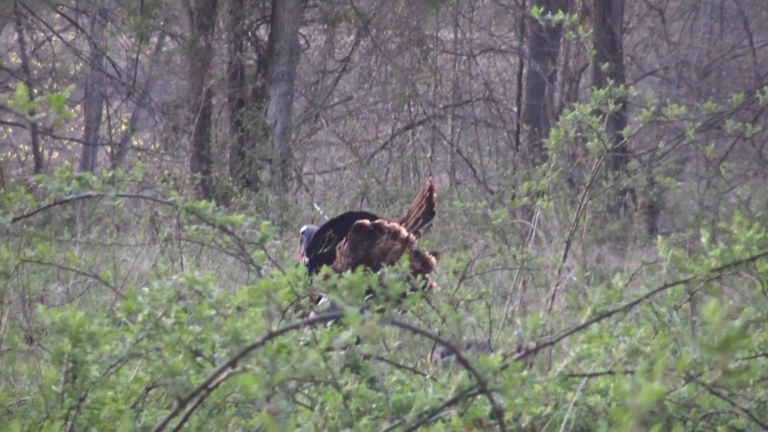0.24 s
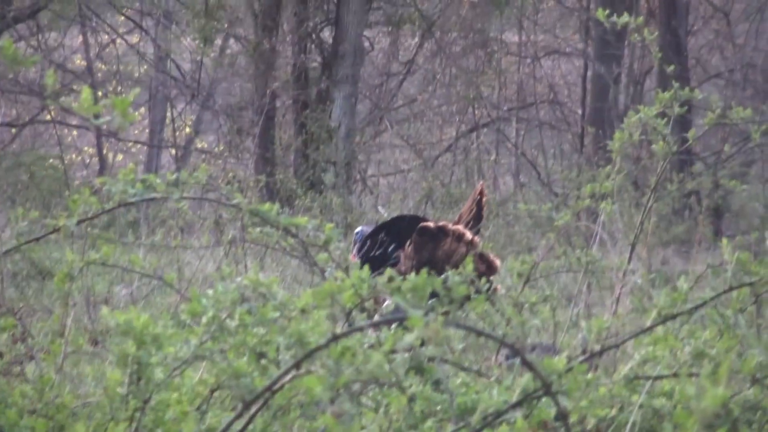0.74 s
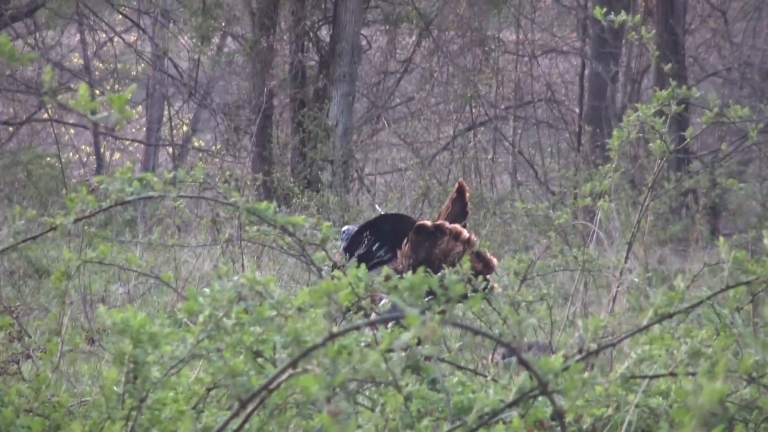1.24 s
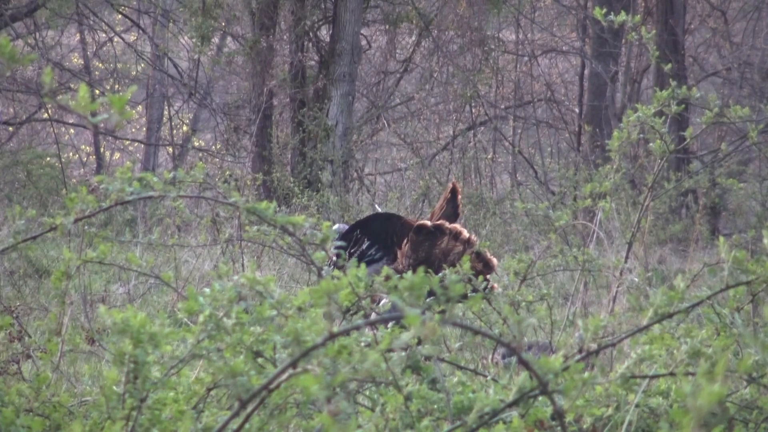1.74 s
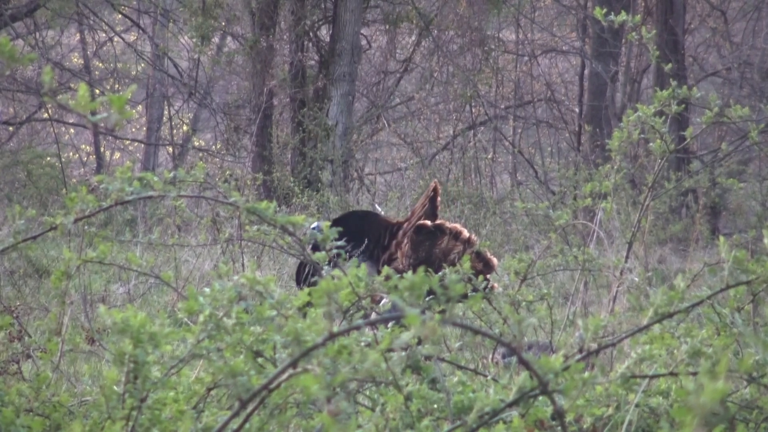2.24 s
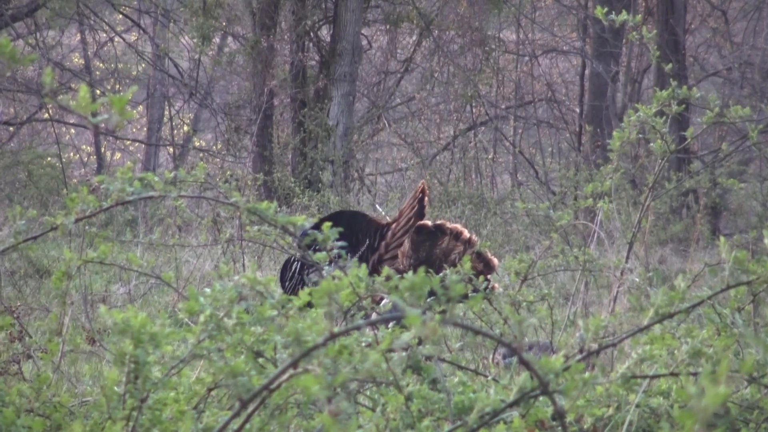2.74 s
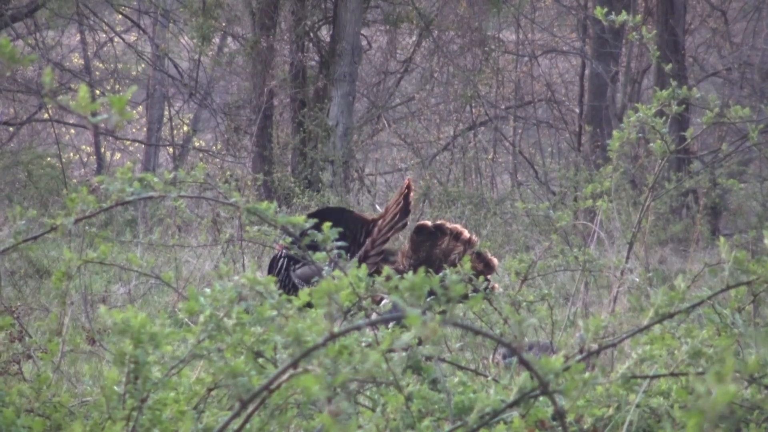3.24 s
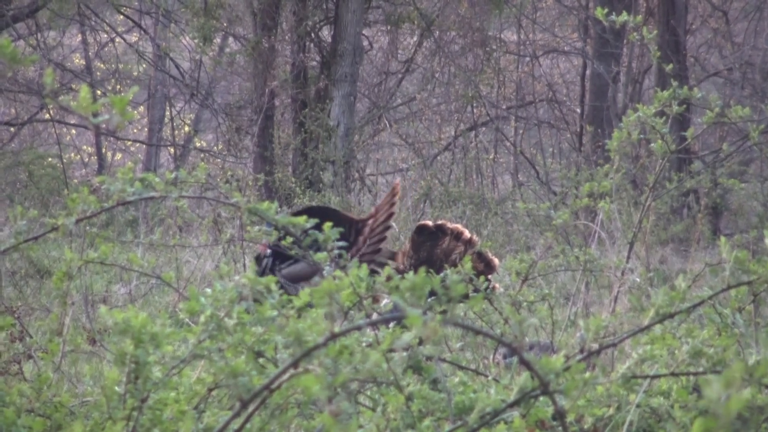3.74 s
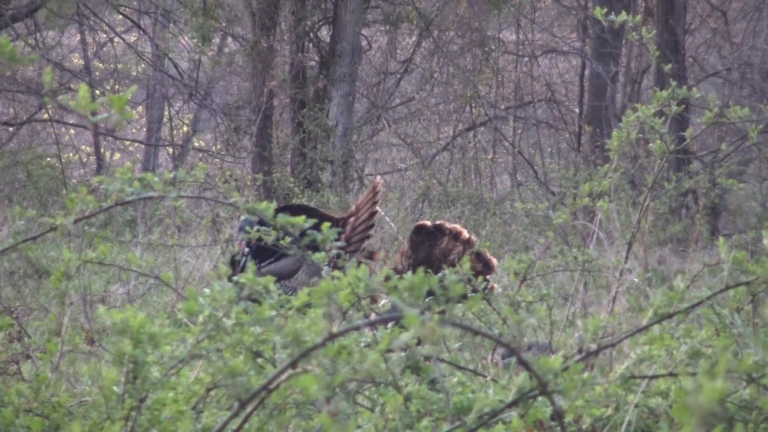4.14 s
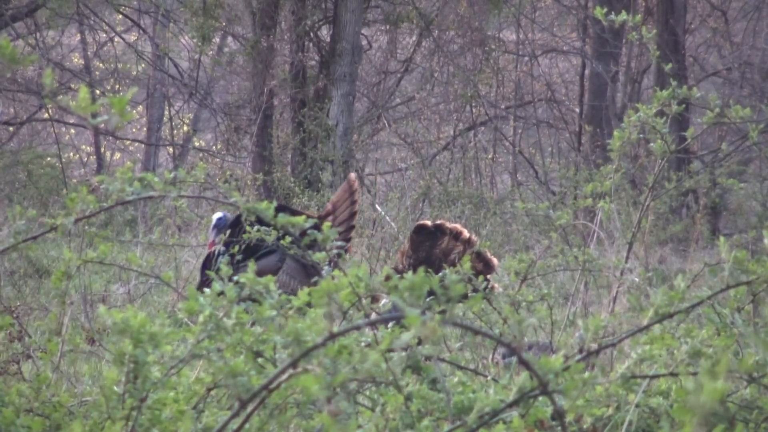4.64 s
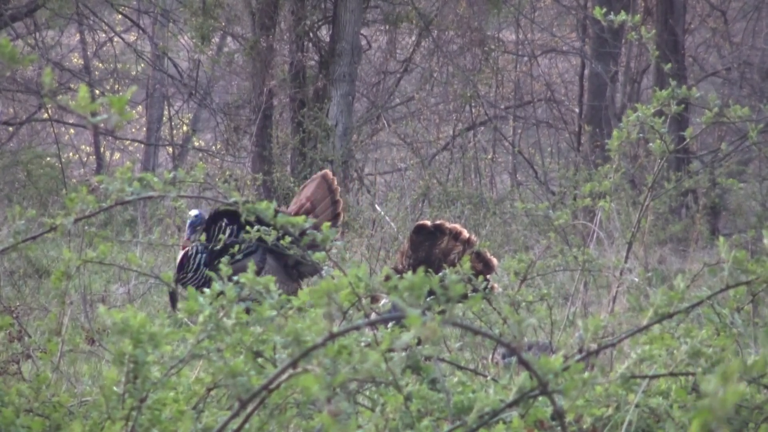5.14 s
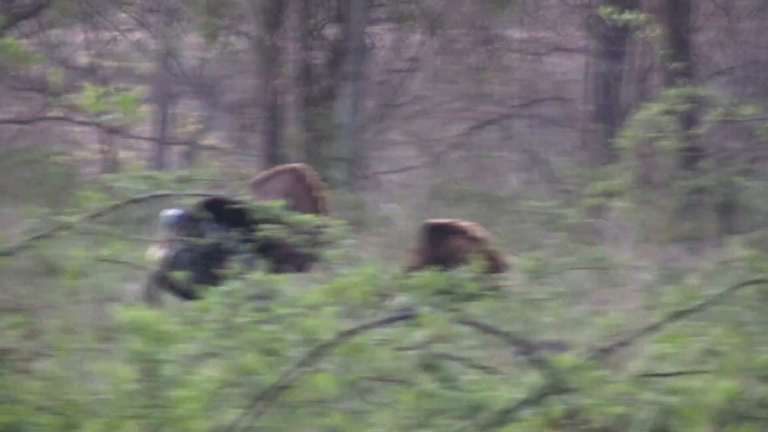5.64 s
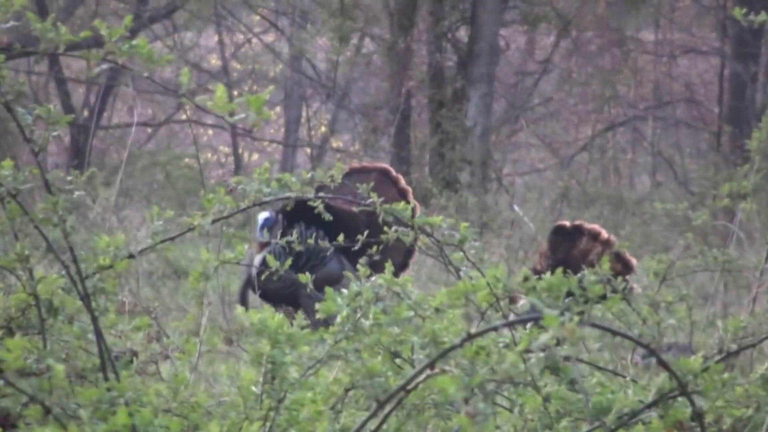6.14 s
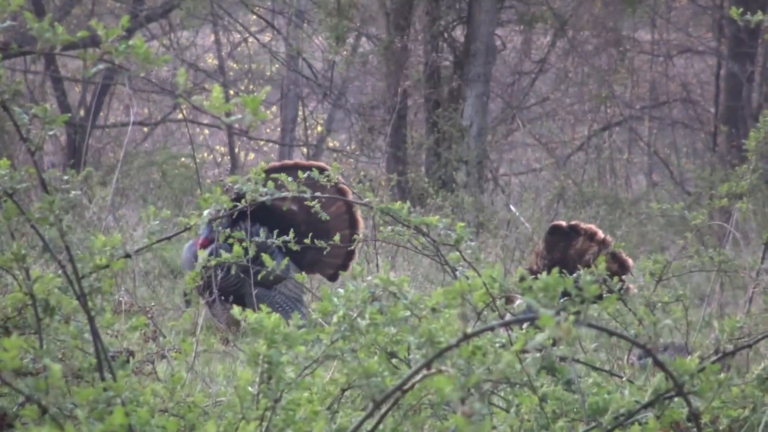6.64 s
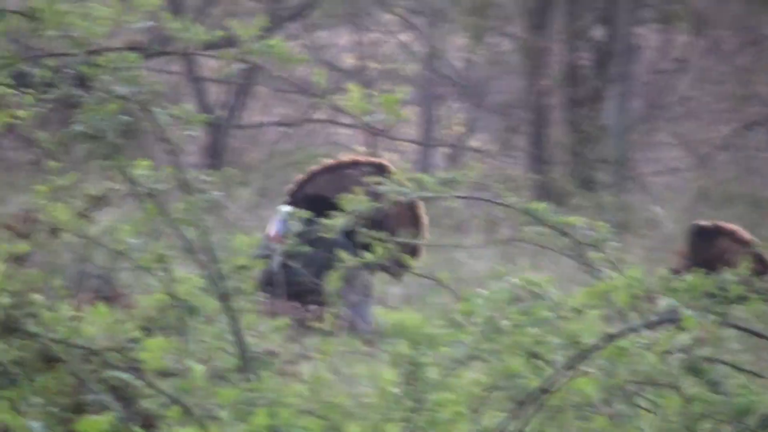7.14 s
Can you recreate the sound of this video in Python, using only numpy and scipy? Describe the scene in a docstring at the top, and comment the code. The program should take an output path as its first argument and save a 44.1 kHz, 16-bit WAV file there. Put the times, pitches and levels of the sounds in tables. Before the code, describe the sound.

Songbirds warble and whistle some way off in the woods, over soft leaf noise and a low drone. A wild turkey gives seven short, sharp, rasping clucks, close and loud, each echoing lightly among the trunks. A bird then sings a rising trill and more whistles, high and low in turn. Near the end a faint far whine passes, twigs tick, and the microphone takes several dull handling bumps.

```python
"""Seven sharp turkey-like clucks, close and loud: a rough, rasping tone through fixed resonances, with a
low fundamental and a bright scrape. Further off in the spring woods, songbirds whistle, slur, warble and
trill in frequency-modulated tones, and the trunks reverberate with every call. Beneath lie a low drone,
leaf noise, microphone hiss, a far whine, and the damped vibrations of twigs and a bumped camera.
The recorder's gain control turns bass and treble down after each cluck."""
import sys
import numpy as np
from scipy import signal
from scipy.fft import rfft, irfft, next_fast_len
from scipy.io import wavfile
from scipy.ndimage import uniform_filter1d, map_coordinates

SR = 44100
rng = np.random.default_rng(int(sys.argv[2]) if len(sys.argv) > 2 else 0)


def unload_wav(signal):
    """Save mono or channel-first audio to the path in sys.argv[1] as 16-bit WAV at rate SR, clipped to [-1, 1]."""
    wavfile.write(
        sys.argv[1],
        SR,
        np.round(np.clip(np.atleast_2d(signal).T, -1, 1) * 32767).astype(np.int16),
    )


N = 325891


def amp(db):
    """Amplitude ratio of a level in decibels."""
    return 10 ** (np.asarray(db) / 20)


def unit(x):
    """Normalisation to rms 1."""
    return x / np.sqrt(np.mean(x ** 2) + 1e-20)


def along(points, hz):
    """Interpolation of (Hz, value) points on a logarithmic frequency axis."""
    f, values = np.transpose(points)
    return np.interp(np.log(hz + 1), np.log(f + 1), values)


def span(start, length):
    """An event's samples, its age in seconds and the share of its length gone."""
    at = np.arange(round(start * SR), round((start + length) * SR))
    age = (at - at[0]) / SR
    return at, age, age / age[-1]


def contours(rows):
    """Linear interpolation in time: a table's samples, a soft-edged gate and its columns per sample."""
    times, *columns = np.transpose(rows)
    at = np.arange(round(times[0] * SR), min(round(times[-1] * SR), N))
    gate = np.clip(np.minimum(at - at[0], at[-1] - at) / 180, 0, 1)
    return at, gate, [np.interp(at / SR, times, column) for column in columns]


def edges(age, attack_s, release_s):
    """Amplitude envelope with quadratic attack and release."""
    return np.clip(np.minimum(age / attack_s, (age[-1] - age) / release_s), 0, 1) ** 2


def wobble(rate, size):
    """Random modulation: a smooth curve through `rate` random values a second."""
    knots = rng.standard_normal(int(size * rate / SR) + 4)
    return map_coordinates(knots, [np.arange(size) * rate / SR])


def phase_of(hz):
    """Phase in radians, the time integral of angular frequency."""
    return 2 * np.pi * np.cumsum(hz) / SR


def tone(hz):
    """A sinusoid of rms 1 that follows a frequency contour."""
    return np.sqrt(2) * np.sin(phase_of(hz))


def filtered(x, response):
    """Linear filtering: the spectrum is multiplied by a frequency response."""
    size = next_fast_len(N + SR // 2)
    return irfft(rfft(x, size) * response(np.fft.rfftfreq(size, 1 / SR)), size)[..., :N]


def coloured(spectrum):
    """Spectral shaping of white noise, scaled to rms 1."""
    return unit(filtered(rng.standard_normal(N), lambda hz: amp(along(spectrum, hz))))


# Three noise spectra. Each row: frequency in Hz, relative spectral density in dB.
DRONE_SPECTRUM = [(12, -52), (20, -13.5), (157, 1.5), (174, -0.5), (220, -8.5), (254, -6.5), (282, -15),
                  (333, -16), (450, -20.5), (580, -51), (990, -120)]
LEAF_SPECTRUM = [(180, -30.5), (300, -9.5), (484, -10), (1470, -16.5), (1660, -19.5), (3440, -25),
                 (6080, -31), (12000, -40), (15600, -73), (22000, -120)]
HISS_SPECTRUM = [(5880, -26), (10000, -13), (14900, 5), (15900, -14.5)]
# Background levels. Each row: time in seconds, leaf level in dB, drone level in dB.
WOODS_LEVELS = [(0, -48.5, -41), (0.401, -54, -45), (.72, -56, -54.5), (.9, -51.5, -41.5),
                (1.3, -48.5, -44.5), (2.1, -46, -41.5), (2.299, -48.5, -41.5), (2.799, -45, -38.5),
                (3.502, -48, -41.5), (4.199, -48.5, -43.5), (4.5, -48, -40), (5.05, -47, -38),
                (5.3, -45.5, -41.5), (5.62, -46.5, -43), (5.65, -53, -35), (5.9, -55.5, -48.5),
                (6.75, -54, -50.5), (7.39, -56, -45.5)]
# Microphone self-noise. Each row: time in seconds, level in dB.
HISS_LEVELS = [(0, -74), (.45, -84.5), (.75, -82.5), (.95, -74), (2.1, -71.5), (2.5, -65), (4.2, -65.5),
               (5.62, -68.5), (5.65, -83.5), (6.3, -79.5), (7.39, -82.5)]


def background():
    """Amplitude-modulated noise: a low drone, leaves and microphone hiss waver in level."""
    t = np.arange(N) / SR
    times, *levels = np.transpose(WOODS_LEVELS)
    leaves_db, drone_db = (np.interp(t, times, level) for level in levels)
    hiss_db = np.interp(t, *np.transpose(HISS_LEVELS))
    sway = wobble(11, N)
    drone = amp(drone_db + 1.4 * wobble(12, N)) * coloured(DRONE_SPECTRUM)
    leaves = amp(leaves_db + 1.1 * sway) * coloured(LEAF_SPECTRUM)
    hiss = amp(hiss_db + 1.2 * sway) * coloured(HISS_SPECTRUM)
    return drone + leaves + hiss


# A far tone that climbs and sinks. Each row: time in seconds, frequency in Hz, level in dB.
WHINE_CONTOUR = [(4.8, 1318, -82), (5.35, 1454, -46.5), (5.9, 1500, -57.5), (6.4, 1460, -62.5),
                 (6.9, 1380, -58)]


def far_whine():
    """Spectral broadening: random amplitude and phase blur a distant tone."""
    at, gate, (hz, db) = contours(WHINE_CONTOUR)
    blur = wobble(110, len(at)) + 1j * wobble(110, len(at))
    out = np.zeros(N)
    out[at] = gate * amp(db) * np.real(blur * np.exp(1j * phase_of(hz)))
    return out


def knocks(events, attack_s, waver, noise):
    """Damped oscillation: a wavering tone and a puff of noise share one exponential decay."""
    out, t = np.zeros(N + SR), np.arange(SR // 5) / SR
    for row, (start, db, hz, t60) in enumerate(events):
        ring = np.sin(phase_of(hz * np.exp(waver * wobble(hz / 2, len(t)))))
        puff = noise[row * len(t):][:len(t)]
        envelope = amp(db + 0.5 - 60 * t / t60) * (1 - np.exp(-t / attack_s)) ** 2
        out[round(start * SR):][:len(t)] += envelope * (ring + puff)
    return out[:N]


# Bumps. Each row: start in seconds, level in dB, frequency in Hz, 60 dB decay time in seconds.
CAMERA_BUMPS = [(0.394, -18.5, 132, 0.065), (5.6, -26.5, 119, 0.31), (5.659, -23, 47.6, 0.1),
                (5.734, -16.5, 160, 0.14), (6.022, -19.5, 137.2, 0.19), (6.741, -30, 129, 0.37),
                (6.793, -23.5, 318, 0.048), (6.814, -23.5, 51.3, 0.13), (6.861, -21, 60.7, 0.23),
                (6.883, -21, 170, 0.15), (7.016, -27, 283, 0.033), (7.116, -30.5, 273, 0.18),
                (7.348, -33.5, 334, 0.06)]
# Thud of the camera body. Each row: frequency in Hz, relative spectral density in dB.
THUD_SPECTRUM = [(15, -2), (40, 3.5), (150, 6.5), (400, -7.5), (700, -40), (1200, -120)]


def camera_bumps():
    """Impact excitation: the camera body answers each bump with a low, damped thud."""
    return knocks(CAMERA_BUMPS, attack_s=0.0016, waver=0.23, noise=amp(-6.5) * coloured(THUD_SPECTRUM))


# Ticks and rustles. Each row: start in seconds, level in dB, frequency in Hz, 60 dB decay time in seconds.
TWIG_TICKS = [(5.254, -26.5, 5350, .015), (5.499, -25, 5300, 0.012), (5.961, -19.5, 5820, 0.0086),
              (6.355, -39, 6084, 0.021), (7.04, -39, 4700, 0.11), (7.041, -44, 2230, 0.093)]
# Bright noise of twigs and clucks. Each row: frequency in Hz, relative spectral density in dB.
RASP_SPECTRUM = [(2600, -39), (3300, 1), (3750, -8), (4250, 1.5), (4900, -14.5), (6500, -11), (9000, -22),
                 (9900, -14.5), (11000, -32.5), (16000, -31)]


def twig_ticks():
    """Damped transients: twigs tick where the decay is fast and rustle where it is slower."""
    return knocks(TWIG_TICKS, attack_s=0.00075, waver=0.049, noise=amp(-13) * coloured(RASP_SPECTRUM))


# Reverberation among the trunks. Each row: frequency in Hz, 60 dB decay time in seconds.
TRUNK_DECAY = [(300, .3), (1200, 0.94), (2000, 0.71), (4400, 0.47), (8000, 0.33)]


def tree_echo(x, wet_db, delay_s, far_db=0):
    """Reverberation: each frequency dies at its own rate; far_db lifts a late echo off far trees."""
    hz, t, noise = signal.stft(rng.standard_normal(SR), SR, nperseg=256)
    far_trees = amp(far_db * np.exp(-((t - 0.11) / 0.012) ** 2))
    decay = amp(-60 * t / along(TRUNK_DECAY, hz)[:, None])
    tail = signal.istft(noise * far_trees * decay, SR, nperseg=256)[1]
    delayed = np.pad(x, (round(delay_s * SR), 0))
    return amp(wet_db) * signal.fftconvolve(delayed, tail / np.linalg.norm(tail))[:N]


# Thin, high notes. Each row: start and length in seconds, base frequency in Hz, onset excess in Hz,
# spacing of the two voices in Hz, level in dB.
THIN_NOTES = [(0, 0.069, 8000, 297, 940, -44.5), (2.416, 0.15, 7620, 2360, 925, -46),
              (4.175, 0.15, 7230, 910, 745, -54), (5.684, 0.082, 7520, 1990, 880, -43),
              (6.666, 0.074, 7310, 338, 306, -55)]


def thin_notes():
    """Biphonation: a bird's two voices drop, rise and quaver together."""
    out = np.zeros(N)
    for start, length, hz, excess_hz, spacing_hz, db in THIN_NOTES:
        at, age, share = span(start, length)
        pitch = hz + excess_hz * np.exp(-age / 0.011) + 881 * share ** 2
        quaver = 100 * wobble(90, len(at))
        envelope = edges(age, 0.014, 0.004) * amp(db - 6.5 * share ** 2 + 3.2 * wobble(420, len(at)))
        out[at] += envelope * (tone(pitch + quaver) + 0.45 * tone(pitch + spacing_hz + 1.4 * quaver))
    return out + tree_echo(out, wet_db=-8, delay_s=0.008)


def sung(hz, db, flutter_db, waver_hz):
    """Shimmer and jitter: a songbird's pure tone varies randomly in level and frequency."""
    return amp(db + flutter_db * wobble(90, len(hz))) * tone(hz + waver_hz * wobble(120, len(hz)))


# Warbled notes. Each row: start and length in seconds, first, middle and last frequency in Hz,
# mid-note level in dB.
WARBLED_NOTES = [ (0.518, 0.018, 5270, 4730, 3500, -53), (0.566, 0.057, 3970, 4500, 4460, -44.5),
                 (0.626, 0.093, 4590, 4180, 4620, -41), (0.732, 0.13, 4700, 5060, 5200, -37),
                 (.84, 0.03, 5000, 4500, 3550, -43.5), (0.741, .12, 3250, 3390, 3450, -51),
                 (0.904, 0.1, 3700, 3910, 3900, -50), (0.991, .065, 3950, 4330, 4580, -53.5),
                 (1.045, .125, 3080, 3725, 3640, -42), (2.72, .025, 4630, 4840, 5400, -53.5),
                 (2.742, 0.021, 5390, 4495, 3490, -48.5), (3.898, 0.065, 4270, 4240, 4670, -37),
                 (3.95, 0.071, 4900, 5260, 5400, -42.5), (3.956, 0.15, 3310, 3590, 3320, -38.5),
                 (4.162, 0.083, 2600, 2650, 2690, -49.5), (4.25, 0.087, 3150, 3466, 3506, -47),
                 (4.984, 0.065, 4980, 6300, 6900, -34), (5.031, 0.036, 7000, 4860, 3970, -32.5),
                 (.33, 0.045, 2040, 2050, 1940, -55.5), (.755, 0.037, 6350, 6550, 6800, -62),
                 (1.75, 0.072, 1930, 2050, 1980, -50.5), (3.02, 0.086, 2420, 2750, 2940, -44),
                 (3.15, 0.087, 2800, 3000, 2880, -40.5), (3.76, 0.037, 5370, 4400, 3420, -49),
                 (4.1, 0.045, 3600, 3720, 4180, -51), (5.99, 0.046, 4280, 3800, 3460, -62.5),
                 (6.1, 0.049, 4250, 3900, 3315, -63)]


def warbles():
    """Frequency modulation: each note bends along a parabola through three pitches."""
    out = np.zeros(N)
    for start, length, first, middle, last, db in WARBLED_NOTES:
        at, age, share = span(start, length)
        centred = 2 * share - 1
        pitch = middle * (1 - centred ** 2) + centred * (last * share - first * (1 - share))
        level_db = db - 10 * centred ** 2
        out[at] += edges(age, 0.003, 0.0044) * sung(pitch, level_db, flutter_db=3.5, waver_hz=55.4)
    return out + tree_echo(out, wet_db=-11, delay_s=0.008)


# Falling slurs. Each row: start and length in seconds, level in dB.
SLURRED_NOTES = [(2.525, 0.1, -33), (2.769, .135, -29.5)]
# The course of one slur. Each row: share of its length, frequency in Hz, relative level in dB.
SLUR_SHAPE = [(0, 2750, -17), (0.211, 2910, 2), (.52, 2926, -0.5), (.74, 2470, -4.5), (1.002, 2200, -7.5)]


def slurs():
    """Glissando: a bird's tone lifts slightly, holds, then glides down."""
    out = np.zeros(N)
    knots, hz, shape_db = np.transpose(SLUR_SHAPE)
    for start, length, db in SLURRED_NOTES:
        at, age, share = span(start, length)
        pitch = uniform_filter1d(np.interp(share, knots, hz), size=300)
        level_db = db + np.interp(share, knots, shape_db)
        out[at] += edges(age, 0.0037, 0.004) * sung(pitch, level_db, flutter_db=2.5, waver_hz=17)
    return out + tree_echo(out, wet_db=-6, delay_s=0.008)


# A rising trill. Each row: time in seconds, syllables per second, top and bottom of the slide in Hz,
# level in dB.
TRILL_CONTOUR = [(3.93, 17, 5200, 3600, -45), (4.18, 17.6, 5750, 3600, -39), (4.39, 19.5, 6850, 3600, -39),
                 (4.58, 21, 7450, 4000, -40), (4.68, 22, 7800, 6200, -38), (4.85, 22.5, 7850, 6600, -38),
                 (4.98, 23, 7600, 6700, -40)]


def trill():
    """Periodic modulation: each syllable buzzes at the top of its range, then slides quickly down."""
    at, gate, (rate, top, bottom, db) = contours(TRILL_CONTOUR)
    cycle = (np.cumsum(rate) / SR + 0.93) % 1
    slide = np.clip((cycle - 0.18) / 0.3, 0, 1)
    buzz_hz = 0.09 * bottom * (1 - 0.6 * slide) * np.abs(wobble(500, len(at)))
    syllables = np.sin(np.pi * np.clip(cycle / 0.56, 0, 1)) * amp(-4 * slide)
    out = np.zeros(N)
    out[at] = gate * amp(db) * syllables * tone(top - (top - bottom) * slide - buzz_hz)
    return out + tree_echo(out, wet_db=-1.5, delay_s=0.0055)


# Long whistles, high and low in turn. Each row: start and length in seconds, base frequency in Hz,
# onset excess in Hz, level in dB before the swell.
WHISTLED_NOTES = [(0.841, .285, 6370, 700, -43.5), (1.207, 0.26, 4500, 80, -33),
                  (1.503, 0.23, 6470, 300, -41.5), (1.78, 0.18, 4440, 90, -30.5),
                  (4.256, 0.31, 6485, 750, -46.5), (4.63, 0.24, 4527, 170, -30.5),
                  (4.941, 0.24, 6490, 20, -48), (5.205, 0.16, 4418, 110, -28)]


def whistles(settle_s=0.024, sag_hz_per_s=247, swell_db_per_s=10):
    """Exponential relaxation: a bird's tone settles onto its pitch, sagging slightly as it swells."""
    out = np.zeros(N)
    for start, length, hz, excess_hz, db in WHISTLED_NOTES:
        at, age, _ = span(start, length)
        pitch = hz + excess_hz * np.exp(-age / settle_s) - sag_hz_per_s * age
        level_db = db + swell_db_per_s * age
        out[at] += edges(age, 0.045, 0.006) * sung(pitch, level_db, flutter_db=1.4, waver_hz=19)
    return out + tree_echo(out, wet_db=-9, delay_s=0.008)


# Two sets of fixed cluck resonances. Each row: centre in Hz, bandwidth in Hz, gain in dB.
LOW_MODES = [(806, 470, -10), (1288, 241, 5), (1506, 121, 10), (3230, 410, -34), (4250, 330, -27)]
HIGH_MODES = [(1157, 43, -1), (1818, 220, 3), (2094, 120, 1.5), (3330, 690, -22), (4270, 490, -23.5)]
# Attenuation common to both sets. Each row: frequency in Hz, gain in dB.
MODE_LOSS = [(600, -5.5), (1100, -1), (2200, -4), (2700, -5.5), (3200, -5)]


def resonance(modes, hz):
    """Modal superposition: the summed response of second-order resonators of alternating sign."""
    response = sum((-1) ** k * amp(db) * 1j * hz * width / (centre ** 2 - hz ** 2 + 1j * hz * width)
                   for k, (centre, width, db) in enumerate(modes))
    return response * amp(along(MODE_LOSS, hz))


def overtones(hz, rough, blend):
    """Harmonic series: partials 2 to 8, scattered by roughness, through a blend of low and high modes."""
    phase = phase_of(hz)
    partials, power = np.zeros((2, len(hz)))
    for k in range(2, 9):
        scatter = 1 + 1.1 * rough * (wobble(300, len(hz)) + 1j * wobble(300, len(hz)))
        response = (1 - blend) * resonance(LOW_MODES, k * hz) + blend * resonance(HIGH_MODES, k * hz)
        partials += np.real(scatter * response * np.exp(1j * k * phase))
        power += np.abs(response) ** 2
    return unit(partials / np.sqrt(power))


# Turkey-like clucks. Each row: start and length in seconds, level and its change over the cluck in dB,
# pitch in Hz at the onset, just after and at the end, roughness (0-1) at start and end, share of the high
# modes (0-1) at start and end, the fundamental's lowest frequency in Hz and its relative level in dB.
CLUCK_NOTES = [ (2.109, 0.057, -4, -9, 579.8, 586, 763, 0.038, 1, 0.37, 0.16, 579.3, 5),
               (2.24, 0.11, -8, -9.5, 771, 725, 858.5, 0.26, .35, 0.033, 0.66, 805, -22),
               (2.956, 0.06, -6, -6.5, 726, 715.6, 798, 0.56, 0.88, 0.13, 1, 847, 1),
               (3.070, 0.06, -2, -14.5, 1045, 779.3, 761, .05, 0.99, 0.68, 0.87, 825, -11),
               (3.280, 0.0718, -9.5, -2, 784.5, 786, 683, 0.47, .2, 0.066, 1, 753, -9),
               (3.557, 0.057, -6, -4.5, 651.3, 629.6, 579, 0.6, .5, .1, .8, 646, -1.5),
               (3.82, .07, -6.5, -9, 727.5, 770, 559, 0.79, .5, 0.041, .8, 630, -2)]


def clucks(onset_s=0.015, tremor_db=1.75):
    """Source-filter principle: overtones give way to noise in the same resonances as the tone roughens."""
    out, rasp = np.zeros(N + 2 * SR), coloured(RASP_SPECTRUM)
    low_noise = unit(filtered(rng.standard_normal(N), lambda hz: resonance(LOW_MODES, hz)))
    high_noise = unit(filtered(rng.standard_normal(N), lambda hz: resonance(HIGH_MODES, hz)))
    foliage = signal.butter(2, 2900, fs=SR, output='sos')  # leaves absorb the echo's treble
    for (start, length, db, fade_db, onset_hz, early_hz, end_hz,
         rough_start, rough_end, blend_start, blend_end, base_hz, base_db) in CLUCK_NOTES:
        at, age, share = span(start, length)
        level_db = db + fade_db * share + tremor_db * wobble(70, len(at))
        envelope = edges(age, 0.004, 0.017) * amp(level_db)
        glide = early_hz + (end_hz - early_hz) * share ** 2
        hz = uniform_filter1d(np.where(age < onset_s, onset_hz, glide), size=200)
        phase = phase_of(hz)
        rough = np.interp(share ** 2, [0, 1], [rough_start, rough_end])
        blend = np.interp(share, [0, 1], [blend_start, blend_end])
        noise = np.sqrt(1 - blend) * low_noise[at] + np.sqrt(blend) * high_noise[at]
        cluck = envelope * (np.sqrt(1 - rough) * overtones(hz, rough, blend) + np.sqrt(rough) * noise)
        fundamental = amp(base_db - 570 * age) * np.sin(phase * base_hz / hz.min())
        scrape = amp(-22.5 - 130 * age) * (1 + np.cos(phase)) * rasp[at]  # pulses once a cycle
        out[at] += cluck + envelope * (fundamental + scrape)  # these two do not carry to the trees
        echo = tree_echo(signal.sosfilt(foliage, cluck), wet_db=-11, delay_s=0.027, far_db=5.5)
        out[at[0]:][:len(echo)] += echo
    return out[:N]


# Brief dips in the level of the mix. Each row: centre and width in seconds, gain in dB.
LEVEL_DIPS = [(0.62, 0.0075, -14), (0.725, 0.0064, -22), (5.963, 0.018, -5), (6.078, 0.017, -4)]


def scene():
    """Superposition: both microphone ports receive the same sum; only a faint hiss differs."""
    t = np.arange(N) / SR
    impacts = camera_bumps() + twig_ticks()
    calls = clucks() + whistles() + slurs() + warbles() + thin_notes() + trill()
    dips_db = sum(db * np.exp(-(2 * (t - centre) / width) ** 2) for centre, width, db in LEVEL_DIPS)
    mid = (background() + far_whine() + impacts + calls) * amp(dips_db)
    side = amp(-92) * coloured(HISS_SPECTRUM)
    return np.array([mid + side, mid - side])


def record(dry):
    """Automatic gain control: lagging behind loud sound, it lowers bass and treble; peaks clip softly."""
    threshold_db, cutoff_hz = -22.5, 15900
    lag = np.arange(SR // 8) / SR
    memory = lag ** 2 * np.exp(-lag / 0.0054)
    power = signal.fftconvolve(np.mean(dry ** 2, axis=0), memory / memory.sum())[:N]
    level_db = 10 * np.log10(np.abs(power) + 1e-9)
    duck = amp(-2.4 * np.clip(level_db - threshold_db, 0, None))
    midrange = filtered(dry, lambda hz: 1 / (1 + (430 / (hz + 1)) ** 8) / (1 + (hz / 4800) ** 8))
    ducked = midrange + duck * (dry - midrange)
    clipped = ducked / (1 + np.abs(ducked) ** 6) ** (1 / 6)
    return filtered(clipped, lambda hz: hz < cutoff_hz)


dry = scene()
out = record(dry)
unload_wav(out)
```